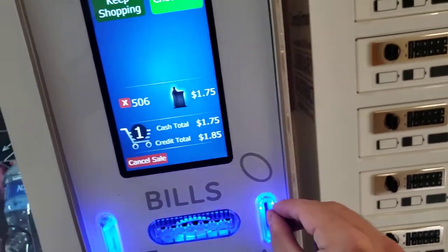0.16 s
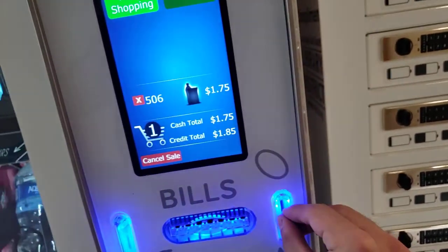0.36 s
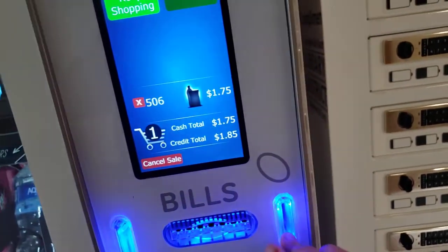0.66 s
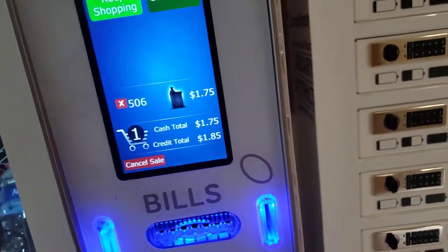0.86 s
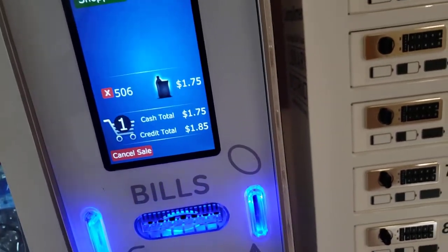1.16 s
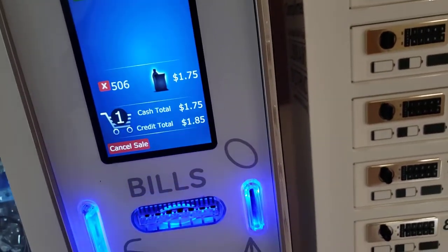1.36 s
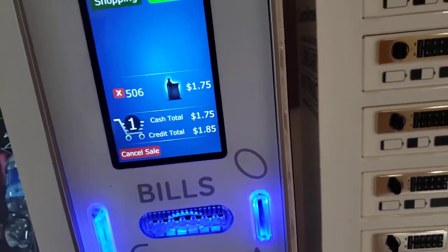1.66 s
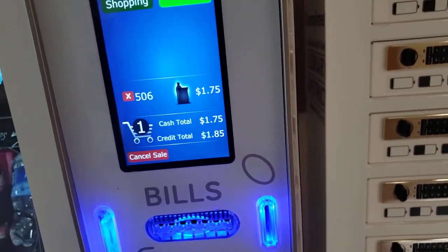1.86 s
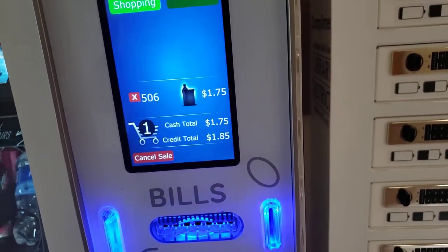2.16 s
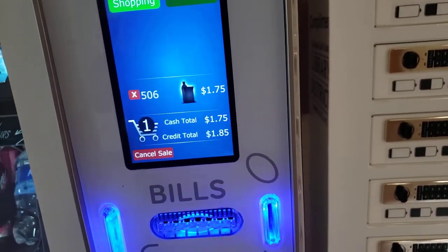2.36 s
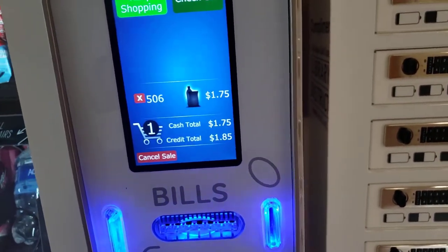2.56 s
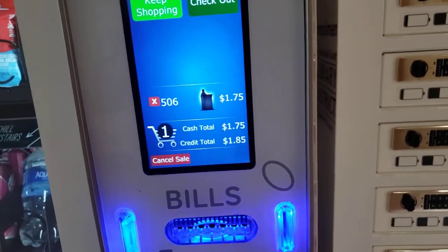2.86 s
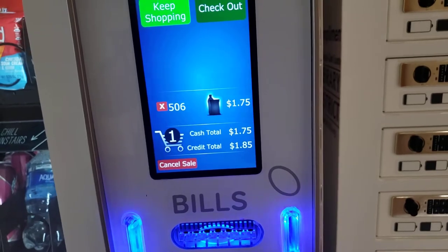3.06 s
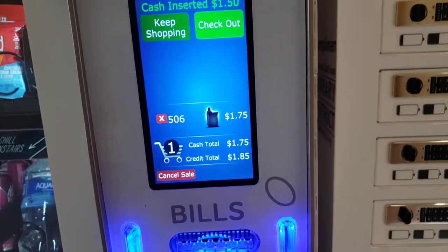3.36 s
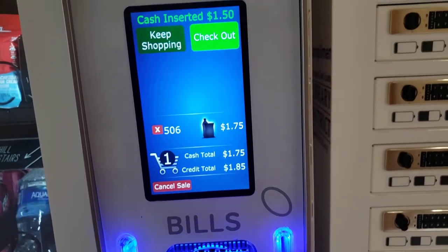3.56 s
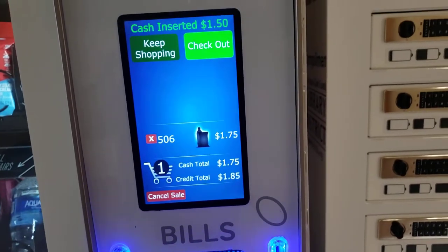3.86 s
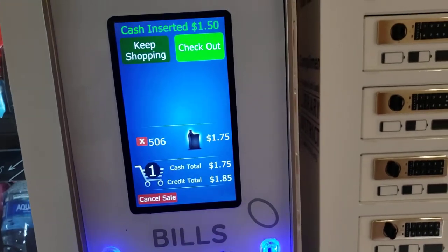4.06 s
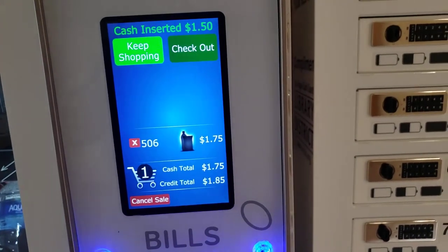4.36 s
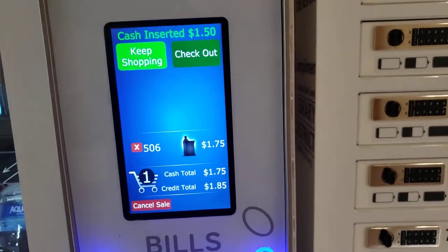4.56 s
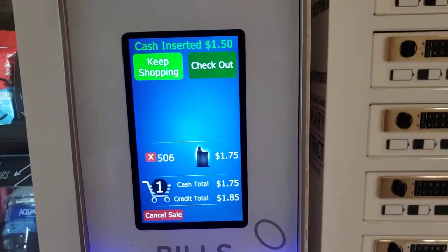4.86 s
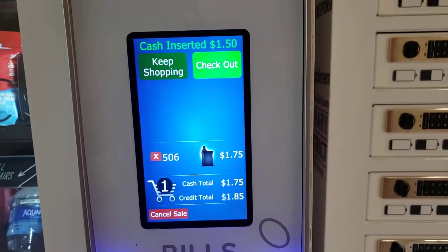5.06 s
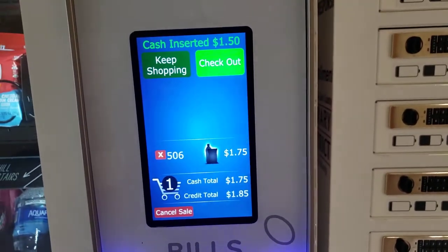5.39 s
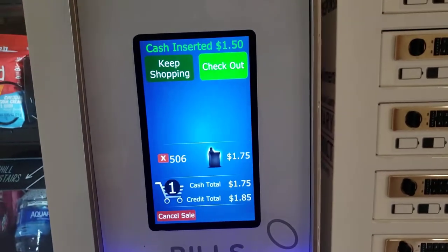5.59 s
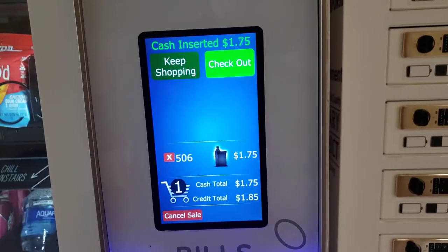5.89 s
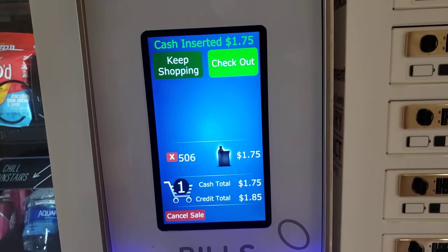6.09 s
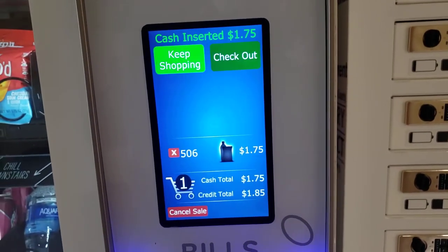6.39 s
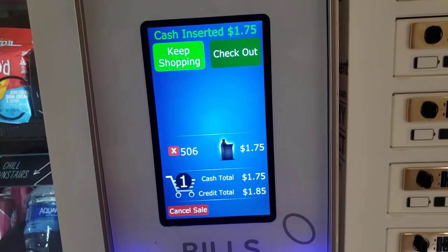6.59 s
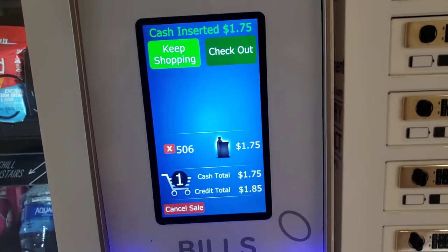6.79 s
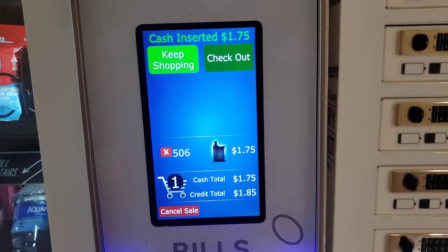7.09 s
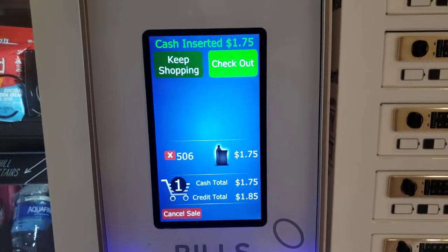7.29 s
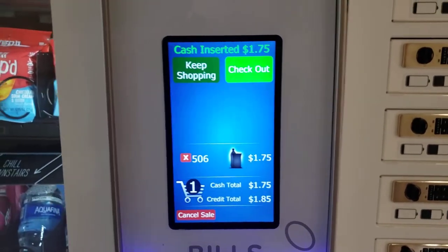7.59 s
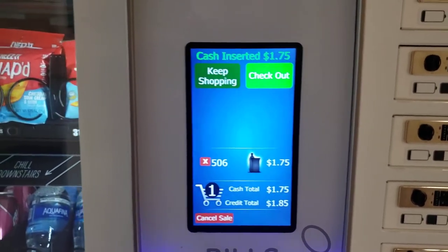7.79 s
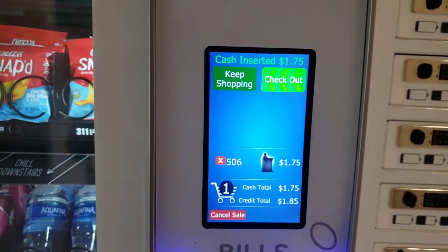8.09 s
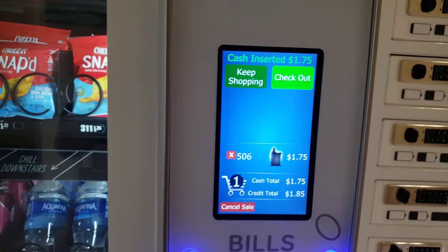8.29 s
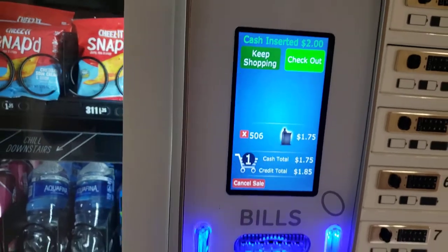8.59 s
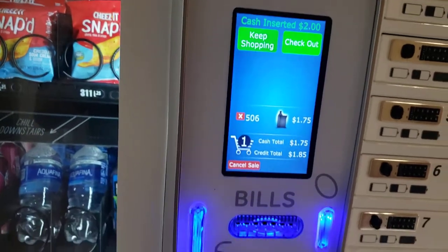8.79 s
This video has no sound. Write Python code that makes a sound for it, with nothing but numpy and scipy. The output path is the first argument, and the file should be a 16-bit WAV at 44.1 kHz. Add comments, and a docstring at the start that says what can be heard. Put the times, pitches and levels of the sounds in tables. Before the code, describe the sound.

Three coins drop one by one into a vending machine, clattering down its chute over a steady cooling hum.

```python
"""A vending machine's cooling unit hums and its fan rumbles, on and on, in a hard-walled lobby.
Three coins go in, one after another. Each knocks on the slot, rolls down the chute, crashes on the
sorter gate and rattles down to the tubes. Every blow shakes the cabinet's panels and the air around
the coin, and now and then the coin itself rings, very high. The lobby echoes the coins, and a
microphone with two close ports (left and right) adds a faint hiss."""
import sys
import numpy as np
from scipy import signal
from scipy.fft import rfft, irfft, next_fast_len
from scipy.io import wavfile

SR = 44100
rng = np.random.default_rng(int(sys.argv[2]) if len(sys.argv) > 2 else 0)


def wav_record(signal):
    """Record a signal, one row per channel, as 16-bit PCM in the file named by sys.argv[1]."""
    frames = np.transpose(np.atleast_2d(signal))
    bounded = np.clip(frames, -1, 1)
    # unit amplitude maps onto the largest positive 16-bit level
    quanta = np.round(bounded * 32767).astype(np.int16)
    wavfile.write(sys.argv[1], SR, quanta)


N = 394245
SIZE = next_fast_len(N + SR)   # spare room for echoes to die away
HZ = np.maximum(np.arange(SIZE // 2 + 1) * SR / SIZE, 1)


def amp(db):
    """Turn decibels (dB) into a number to multiply by."""
    return 10 ** (np.asarray(db) / 20)

def unit_power(x):
    """Scale a signal to an average power of 1."""
    return x / np.sqrt(np.mean(x ** 2) + 1e-20)

def at_hz(rows, hz):
    """Read a table of (Hz, value) rows at any frequency."""
    row_hz, values = np.transpose(rows)
    return np.interp(np.log(hz), np.log(row_hz), values)

def in_time(rows):
    """Read a table of (seconds, value) rows at every sample."""
    return np.interp(np.arange(N) / SR, *np.transpose(rows))

def drift(rate_hz):
    """A smooth random wobble, about 1 in size."""
    r = np.exp(-80 * np.pi * rate_hz / SR)
    slow = signal.lfilter([1], [1, -2 * r, r * r], rng.standard_normal(N // 40 + 2002))[2000:]
    return np.interp(np.arange(N) / 40, np.arange(len(slow)), unit_power(slow))

def sides(db):
    """Left and right gains that make the left louder by db."""
    return np.array([amp(db / 2), amp(-db / 2)])

def stereo_noise(spectrum, likeness, balance_db):
    """Shaped noise; a likeness of 1 puts the same noise in both ears, 0 unrelated noise."""
    mid, side = rfft(rng.standard_normal((2, SIZE)))
    both = np.sqrt(1 + likeness) * mid + np.sqrt(1 - likeness) * side * [[1], [-1]]
    return unit_power(irfft(both * amp(at_hz(spectrum, HZ)) * sides(balance_db), SIZE)[:, :N])

def resonance(hz, centre, width):
    """How a ringing thing responds: most strongly at its centre pitch."""
    return width / (width + 2j * (hz - centre))


# The compressor's tones. Each row: pitch in Hz, base level in dB.
HUM_TONES = [(296.1, -55.5), (371.4, -49), (403.7, -69), (506.0, -63), (592.2, -68.5)]
# The hum swells with the listener's place in the room's standing waves (its loud and quiet spots).
# Each row: time in seconds, level change in dB.
HUM_SWELL = [(0, 0.5), (.6, 1), (3, 2), (6, 1), (7.6, 1.5), (8.3, -2), (8.94, -3)]

def hum():
    """The cooling unit's compressor hums, each tone wavering a little in pitch and level."""
    t, out = np.arange(N) / SR, 0
    for hz, db in HUM_TONES:
        phase = 2 * np.pi * (hz * t + np.cumsum(.8 * drift(3)) / SR + rng.random())
        out = out + np.sqrt(2) * amp(db + 0.22 * drift(9.7)) * np.sin(phase)
    return out * amp(in_time(HUM_SWELL)) * sides(-.6)[:, None]


# The fan's rumble. Each row: frequency in Hz, relative level in dB.
FAN_SPECTRUM = [(15, -38.5), (32, -12), (57, -6.5), (100, -7), (155, -1), (195, -12), (228, -3), (335, -12),
                (376, -16), (440, -18), (510, -18.5), (600, -20), (1400, -34.5), (2080, -33), (2600, -63.5),
                (4000, -100)]
# How alike the fan is in both ears. Each row: frequency in Hz, likeness from 0 to 1.
FAN_LIKENESS = [(30, 0.92), (250, 0.96), (600, 0.94), (1400, .2), (4000, .05)]
# Which way the fan and the hiss lean. Each row: frequency in Hz, left over right in dB.
NOISE_BALANCE = [(60, 2.5), (130, 1), (290, 3.5), (640, 5.5), (1410, 15.5), (3100, 1.5), (6820, -1.5),
                 (15000, -3)]
FAN_DB = -46

def fan():
    """The fan makes a low rush of noise that swells slightly along with the hum."""
    rumble = stereo_noise(FAN_SPECTRUM, at_hz(FAN_LIKENESS, HZ), at_hz(NOISE_BALANCE, HZ))
    return rumble * amp(FAN_DB + 0.36 * in_time(HUM_SWELL))


# The three coins. Each row: times in seconds of entering the slot, hitting the gate, dropping on
# and coming to rest, then base rolling level in dB.
COIN_TRIPS = [(0.533, 1.022, 1.4, 1.93, -47), (3.769, 4.266, 4.725, 5.2, -46.5),
              (6.567, 6.939, 7.449, 7.8, -45.5)]
# Rolling along the way. Stages are -1 in hand, 0 slot, 1 gate, 2 drop, 3 rest, 4 still.
# Each row: stage, change in rolling level in dB, sizzle (top treble) in dB compared with rolling.
ROLL_BY_STAGE = [(-1, -43, -35), (0.41, -5, -25), (0.5, 3, -17), (0.29, -7.5, -33.5), (1.17, 3, -35.5),
                 (0.48, -8.5, -19.5), (1.07, 8, -15), (1.2748, 4, -12), (1.43, 1, -6), (1.51, -5, -26),
                 (2.43, -12.5, -38.5), (2, -8.5, -10.5), (2.5, -1, -21), (3, -4.5, -15), (3.5, -20, -22),
                 (3.5, -45, -30.5)]
# The air gap around the coin. Each row: stage, pitch in Hz, strength in dB, pitch scatter as a fraction.
AIR_GAP = [(-.05, 1500, -4, .05), (0, 2340, 6, .01), (.2, 2400, 2, .02), (.27, 2900, 1, .02),
           (.55, 2680, 2, .02), (.8, 2350, 2, .03), (.995, 2150, 3, .01), (1.003, 1425, 0, .015),
           (1.17, 1425, -2, .03), (1.21, 1880, -1, .04), (1.5, 1900, -4, .06), (2, 1600, -4, .07),
           (3, 1750, -4, .07), (4, 1500, -4, .05)]
LEAD_S, SETTLE_S = .08, .25   # scraping before the slot, dying away after rest

def journey(times):
    """Follow the coins down: their stage, rolling level, sizzle and air gap at the given times."""
    slot, gate, drop, rest, level_db = np.transpose(COIN_TRIPS)
    marks = np.transpose([slot - LEAD_S, slot, gate, drop, rest, rest + SETTLE_S])
    coin = np.maximum(np.searchsorted(marks[:, 0], times) - 1, 0)
    stage = np.choose(coin, [np.interp(times, row, np.arange(-1, 5)) for row in marks])
    roll, gap = np.transpose(ROLL_BY_STAGE), np.transpose(AIR_GAP)
    db, sizzle_db = [np.interp(stage, roll[0], column) for column in roll[1:]]
    air_gap = np.transpose([np.interp(stage, gap[0], column) for column in gap[1:]])
    return stage, db + level_db[coin], sizzle_db, air_gap


# The chute's dense clatter. Each row: frequency in Hz, relative level in dB.
CHUTE_SPECTRUM = [(240, -49.5), (400, -9), (767, -12.5), (1050, -11.5), (1430, -9), (2170, -8.5),
                  (2420, -17.5), (6500, -12.5), (7740, -35.5), (12300, -9.5), (14000, -20), (16300, -16.5)]
# The notes the cabinet's panels ring at. Each row: pitch in Hz, width in Hz, strength in dB.
PANEL_NOTES = [(802.7, 20, -5.5), (874, 31, -4.5), (1375, 40, -8.5), (1670, 68, -16), (2120, 130, -10.5),
               (3022, 64, -14), (4014, 740, -9), (4524, 200, -2), (4936, 150, -1.5), (5376, 170, -5.5),
               (6300, 380, -12)]
# Low sounds reach both ports alike. Each row: frequency in Hz, shared part from 0 to 1.
SHARED_PATH = [(600, 0.99), (1100, 0.63), (4000, 0.2), (12000, 0.03)]
CHUTE_FADE_S, PANEL_SCATTER_DB, GAP_WIDTH_HZ, LEFT_LAG_S = 0.019, 2.5, 100, 0.00013
BLOW = 4096   # samples that hold one blow
BLOW_HZ = np.maximum(np.arange(BLOW // 2 + 1) * SR / BLOW, 1)

def cabinet(air_gap):
    """Chute, panels and air gap ring together; gives a left and a right spectrum for each blow."""
    t, hz, count = np.arange(1024) / SR, BLOW_HZ, len(air_gap)
    # Three paths: one shared, and one to each port.
    clatter = rng.standard_normal((count, 3, t.size)) * amp(-60 * t / CHUTE_FADE_S)
    paths = rfft(clatter, BLOW) * amp(at_hz(CHUTE_SPECTRUM, hz))
    paths /= np.sqrt(CHUTE_FADE_S * SR / np.log(1e6))
    # Every spot on the chute shakes the panels differently.
    luck = rng.standard_normal((count, 3, len(PANEL_NOTES), 2))
    strengths = np.sign(luck[..., 0]) * amp(np.array(PANEL_NOTES)[:, 2] + PANEL_SCATTER_DB * luck[..., 1])
    paths += strengths @ np.array([resonance(hz, centre, width) for centre, width, _ in PANEL_NOTES])
    share = np.clip(at_hz(SHARED_PATH, hz), 0, 1)
    body = np.sqrt(share) * paths[:, :1] + np.sqrt(1 - share) * paths[:, 1:]
    gap_hz, gap_db, scatter = air_gap.T
    gap_hz = gap_hz * (1 + scatter * rng.standard_normal(count))
    body += (amp(gap_db[:, None]) * resonance(hz, gap_hz[:, None], GAP_WIDTH_HZ))[:, None]
    body[:, 0] *= np.exp(-2j * np.pi * hz * LEFT_LAG_S)
    return body


# The three borders in Hz between four bands, from low to high: thud, knock, click and sizzle.
BAND_EDGES = [1500, 3200, 8000]

def strike(starts, band_db, air_gap, rattle_s):
    """Each blow is a sharp tap and a dying rattle, heard through the cabinet."""
    t, shape = np.arange(BLOW) / SR, (len(starts), BLOW)
    taps = (rng.random(shape) < 3500 / SR) * rng.laplace(0, .7, shape)   # about 3500 a second
    taps *= np.exp(-t / np.clip(rattle_s, .001, .03)[:, None])
    taps *= np.cos(np.pi / 2 * t / t[-1]) ** 2   # the rattle has stopped by the end
    taps[:, 0] = 1.6   # the first contact
    sound = cabinet(air_gap) * rfft(taps)[:, None]
    # Bring each band to the energy of a sound dying away from its level in band_db.
    below = [1 / (1 + (BLOW_HZ / edge) ** 8) for edge in BAND_EDGES]
    bands = np.diff(below, axis=0, prepend=0, append=1)
    power = 0.99 * np.abs(sound.mean(axis=1)) ** 2 + 0.43 * np.mean(np.abs(sound) ** 2, axis=1)
    energy = power @ (bands.T ** 2) * 2 / BLOW
    wanted = amp(band_db) ** 2 * (rattle_s[:, None] + 0.0017) * SR / 4
    sound *= (np.sqrt(wanted / energy) @ bands)[:, None]
    return place_blows(starts, sound)


# Which way the blows lean. Each row: frequency in Hz, left over right in dB.
BLOW_BALANCE = [(60, 1.5), (110, 3.5), (200, 10.5), (380, 2.5), (700, 1.5), (1290, 11), (2380, 3.5),
                (4400, 2.5), (8120, -2), (15000, 8.5)]

def place_blows(starts, spectra):
    """Lean the blows left or right and put each at its start time."""
    lead = 64   # samples kept ahead of each tap, so its onset stays whole
    blows = np.roll(irfft(spectra * sides(at_hz(BLOW_BALANCE, BLOW_HZ)), BLOW), lead, axis=2)
    out = np.zeros((2, SIZE))
    for at, blow in zip(np.round(starts * SR).astype(int) - lead, blows):
        out[:, at:at + BLOW] += blow
    return out


# The knocks that stand out. Each row: start in seconds, base level in dB, thud and click in dB
# compared with that level, rattle length in seconds.
COIN_KNOCKS = [(0.2232, -33.5, -11.5, -17.5, 0.018), (0.2634, -42, -8, -13, 0.0071),
               (0.4662, -51, -6.5, -29, 0.031), (0.5312, -45.5, -1.5, -19, 0.028),
               (0.563, -35.5, -6, -10.5, 0.023), (0.606, -35.5, -12.5, -8.5, 0.0042),
               (0.634, -41.5, -5, -10, 0.0064), (0.6609, -41.5, 0, -7, 0.0054),
               (0.7421, -51, -1.5, -31, 0.021), (0.792, -42, 0, -26, 0.025),
               (0.8728, -37.5, -3, -12.5, 0.011), (0.9139, -28.5, -10.5, -5, 0.023),
               (1.0153, -20.5, -24, -8, 0.016), (1.024, -23.5, -8.5, 5, 0.0087),
               (1.0322, -17, -7.5, -22, 0.011), (1.0497, -25.5, -9, -9, .012),
               (1.125, -31.5, -10.5, -14, 0.039), (1.191, -36.5, -7.5, -3, 0.056),
               (1.253, -45, -9, -6, .01), (1.295, -48, -7, -4, .01), (1.5501, -33.5, -0.5, -4, 0.016),
               (1.61, -33.5, 1, -2.5, 0.0095), (1.707, -32, -5, -9, 0.022),
               (1.7615, -36.5, -6, -4.5, 0.011), (1.8146, -38.5, 1.5, -8, 0.037),
               (1.837, -34.5, -4.5, -23, .008), (1.9134, -41, 2, -13, 0.037),
               (2.8622, -47, 7.5, -24, 0.0061), (3.205, -57, 12.5, -20.5, .007),
               (3.293, -37.5, -7.5, -20.5, 0.015), (3.3442, -40.5, 2, -33.5, 0.0079),
               (3.6023, -39.5, -6, -13, 0.023), (3.7746, -21.5, -30.5, -10.5, 0.013),
               (3.7874, -38, -15.5, -10, .008), (3.8077, -23, -22, -4.5, 0.0043),
               (3.8238, -32, -8, -3, 0.0067), (3.8438, -36, -5, -13, 0.026),
               (3.905, -34, -9.5, -11, 0.0062), (4.0301, -34.5, -9.5, -20, 0.016),
               (4.07, -40, -0.5, -33, 0.035), (4.1597, -35.5, -14.5, -5, 0.019),
               (4.1737, -32, -13, -7, 0.014), (4.263, -22, -9, -6.5, 0.019),
               (4.2747, -20, -10.5, -12, 0.02), (4.2853, -21, -11, -1, 0.018), (4.2972, -27, 0, -21, 0.019),
               (4.326, -26, -19, -27, 0.014), (4.3732, -22, -30, -20, 0.0085),
               (4.4279, -31, -22, -8, 0.039), (4.7251, -39.5, 4, -3.5, 0.033),
               (4.7709, -35, 3.5, -4.5, 0.029), (4.816, -36.5, -7.5, -13, 0.01),
               (4.8742, -31, -5, -10, 0.014), (4.9786, -36, -10, -9.5, .03), (5.0174, -42, 5, 0, 0.017),
               (5.0887, -36, -5.5, -13.5, 0.0089), (5.1207, -38, -4.5, -12.5, 0.018),
               (5.2636, -35.5, -5, -11.5, 0.044), (5.4502, -35.5, 1.5, -23.5, 0.022),
               (5.585, -48.5, -8, -5.5, 0.033), (5.731, -51.5, 7, -25.5, 0.012),
               (6.0261, -62.5, 10.5, -22, .016), (6.554, -44.5, -8, -9.5, 0.01),
               (6.57, -19.5, -20.5, -8, 0.0063), (6.6222, -32, -11, -12, 0.024),
               (6.6718, -33, -6, -8, 0.0096), (6.755, -26, -17.5, -19.5, 0.013),
               (6.7814, -25.5, -13, -6.5, 0.0099), (6.8186, -27.5, -17.5, -1, 0.015),
               (6.945, -24, -8, -3.5, 0.062), (6.9641, -23.5, -1.5, -9, 0.018),
               (6.9874, -22.5, -7, -7, 0.014), (7.016, -27, -14.5, -26, 0.011),
               (7.0534, -35, -11.5, -7.5, 0.0095), (7.0919, -32.5, -18.5, -12, 0.028),
               (7.1146, -35.5, -6, -5, 0.036), (7.1537, -40, -18, -5, 0.034), (7.449, -40, 5, -1.5, 0.028),
               (7.5061, -36, -0.5, -5, 0.016), (7.606, -35, -3, -7, 0.024), (7.663, -39, -1.5, -7, 0.013),
               (7.7128, -43, 5, -1, 0.033), (7.7909, -45.5, -3, -8, 0.011)]
# Level changes in dB for every knock's four bands: thud, knock, click, sizzle.
BAND_BOOST = [2.5, -2, 3.5, -4]
SIZZLE_INSIDE_DB, SIZZLE_IN_HAND_DB = -6, -20

def knocks():
    """Coins knock, coloured by where they are; harder clicks sizzle more."""
    starts, db, thud_db, click_db, rattle_s = np.transpose(COIN_KNOCKS)
    stage, _, _, air_gap = journey(starts)
    inside = (stage > -1) & (stage < 4)
    sizzle_db = click_db + np.where(inside, SIZZLE_INSIDE_DB, SIZZLE_IN_HAND_DB)
    band_db = db[:, None] + np.transpose([thud_db, 0 * db, click_db, sizzle_db]) + BAND_BOOST
    return strike(starts, band_db, air_gap, rattle_s)


# Level changes in dB for a rolling coin's three lower bands: thud, knock, click.
ROLL_BANDS = [0, 1, -14]
TICKS_PER_S, CHATTER_DB, CHATTER_FADE_DB_PER_S, SLOT_BOOM_DB = 80, -22, 92, 2.5

def rolling():
    """The coin's ridged rim, and the chatter after each knock, make a fast run of small uneven ticks."""
    count = N * TICKS_PER_S // SR
    ticks = (np.arange(count) + rng.random(count)) / TICKS_PER_S
    uneven_db = rng.normal(0, 2.5, count)
    stage, roll_db, sizzle_db, air_gap = journey(ticks)
    knock_s, knock_db = np.transpose(COIN_KNOCKS)[:2]
    since = ticks[:, None] - knock_s
    chatter = amp(knock_db + CHATTER_DB - CHATTER_FADE_DB_PER_S * np.abs(since)) * (since > 0)
    db = 10 * np.log10(amp(roll_db) ** 2 + np.sum(chatter ** 2, axis=1))
    band_db = np.transpose([db + change for change in (*ROLL_BANDS, sizzle_db)]) + uneven_db[:, None]
    band_db[:, 0] += SLOT_BOOM_DB * (stage < 1)   # the chute booms more above the gate
    heard = db > -78
    return strike(ticks[heard], band_db[heard], air_gap[heard], rattle_s=np.full(heard.sum(), .014))


COIN_HZ, SHIMMER_DB = 15120, -6   # the coin's main note; its level compared with the rolling sizzle

def shimmer():
    """Tumbling keeps the coin's main note faintly ringing."""
    _, roll_db, sizzle_db, _ = journey(np.arange(SIZE) / SR)
    shaking = rfft(rng.standard_normal((2, SIZE)))
    ring = unit_power(irfft(shaking * resonance(HZ, COIN_HZ, width=120), SIZE))
    return ring * amp(roll_db + sizzle_db + SHIMMER_DB) * sides(5.5)[:, None]


# Moments when a coin rings freely. Each row: start in seconds, base level in dB.
CLINKS = [(0.9143, -50), (1.0231, -42), (1.1932, -43), (1.9124, -44.5), (3.8067, -45), (4.262, -39),
          (4.4263, -50), (5.1307, -52), (6.57, -50), (6.9441, -43), (7.0908, -51), (7.8042, -37.5),
          (7.8555, -50.5)]
# The coin's notes. Each row: pitch as a multiple of COIN_HZ, relative level in dB, seconds to fade 60 dB.
COIN_NOTES = [(1, -3, .14), (1.004, -3, .08), (.985, -22, .06)]
CLINK_RISE_S = .002

def clinks():
    """A struck coin flexes and rings; its level flutters as it tumbles."""
    out, t = np.zeros(SIZE), np.arange(SR // 2) / SR
    rise = 1 - np.exp(-t / CLINK_RISE_S)
    for start, db in CLINKS:
        at = round(start * SR)
        for ratio, note_db, fade_s in COIN_NOTES:
            tone = np.sin(2 * np.pi * ratio * COIN_HZ * t)
            out[at:at + t.size] += amp(db + note_db - 60 * t / fade_s) * rise * tone
    out[:N] *= amp(3.0 * drift(60))
    return out * sides(5.5)[:, None]


# How long the lobby echoes. Each row: frequency in Hz, seconds to fade 60 dB.
LOBBY_FADE = [(500, 0.47), (2000, 0.69), (5000, 0.52), (12000, 0.28)]
LOBBY_DB = -9.5

def lobby(sound):
    """Add the echo of hard walls: ten delays a side repeat the sound, weaker on every bounce."""
    fade_s, echo = at_hz(LOBBY_FADE, HZ), np.zeros((2, HZ.size), complex)
    for k, lag_s in enumerate(rng.uniform(.018, 0.057, 20)):
        bounce = amp(-60 * lag_s / fade_s) * np.exp(-2j * np.pi * HZ * lag_s)
        echo[k % 2] += (-1) ** (k // 2) * bounce / (1 - bounce)
    for lag_s in (.0017, .0043):   # two allpass filters smear the echoes in time
        delay = np.exp(-2j * np.pi * HZ * lag_s)
        echo *= (delay - .6) / (1 - .6 * delay)
    share = np.clip(at_hz(SHARED_PATH, HZ), 0, 1)
    echo = (share * echo.mean(axis=0) + (1 - share) * echo) / np.sqrt(10)
    direct = rfft(sound)
    return irfft(direct + amp(LOBBY_DB) * echo * direct[::-1], SIZE)[:, :N]   # echoes swap sides


def scene():
    """Echoing coins over the fan and the hum."""
    return fan() + lobby(knocks() + rolling() + clinks() + shimmer()) + hum()


# The microphone's own hiss. Each row: frequency in Hz, relative level in dB.
HISS_SPECTRUM = [(1350, -34.5), (2300, -3), (3490, -4.5), (4300, -2), (7090, -19), (12100, -8.5),
                 (15700, -4)]
HISS_DB, CUTOFF_HZ = -76.5, 16100

def record(dry):
    """The microphone adds its hiss, and the very highest treble is cut."""
    hiss = amp(HISS_DB) * stereo_noise(HISS_SPECTRUM, .1, at_hz(NOISE_BALANCE, HZ))
    return signal.sosfilt(signal.cheby2(16, 60, CUTOFF_HZ, fs=SR, output="sos"), dry + hiss)


dry = scene()
out = record(dry)
wav_record(out)
```